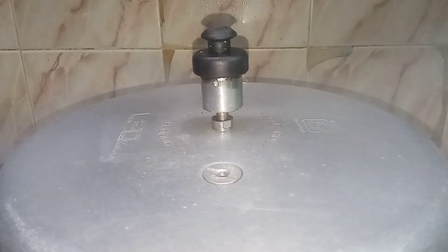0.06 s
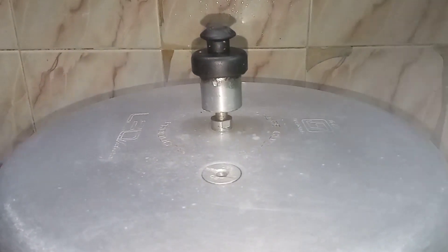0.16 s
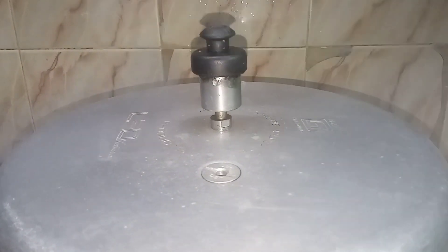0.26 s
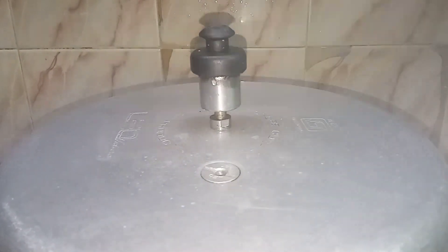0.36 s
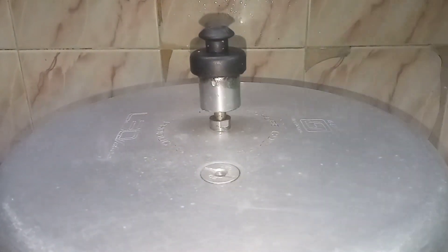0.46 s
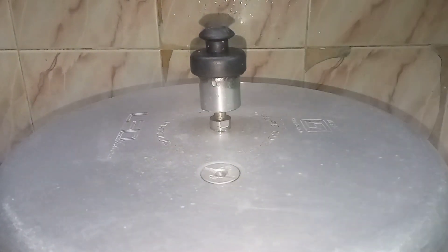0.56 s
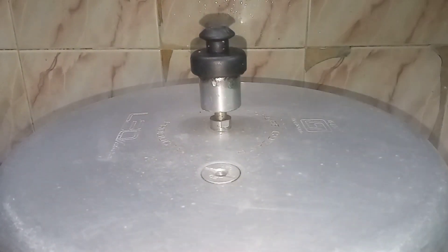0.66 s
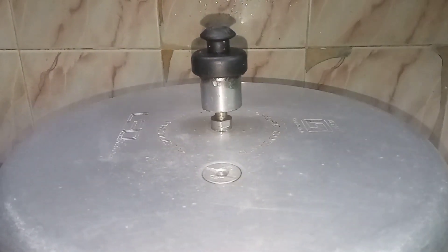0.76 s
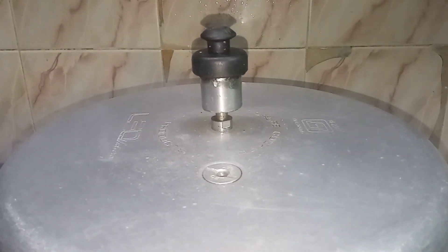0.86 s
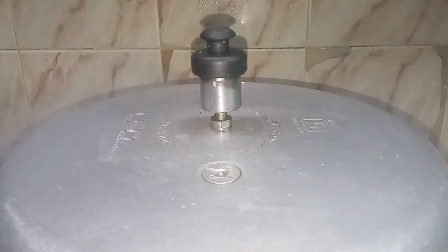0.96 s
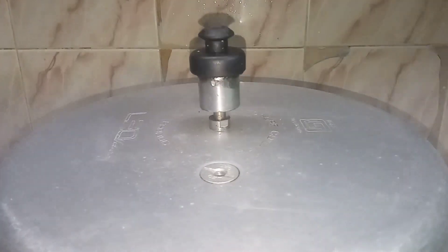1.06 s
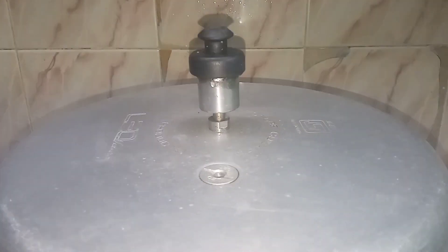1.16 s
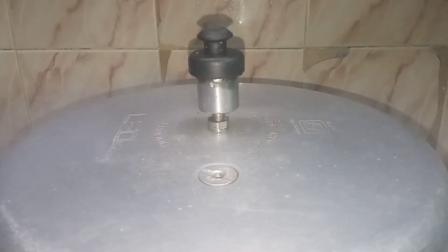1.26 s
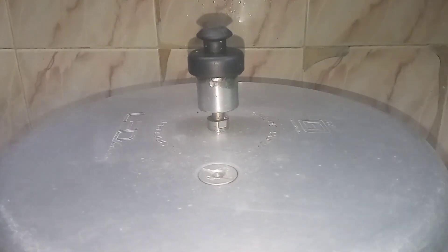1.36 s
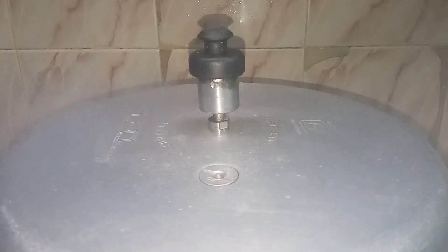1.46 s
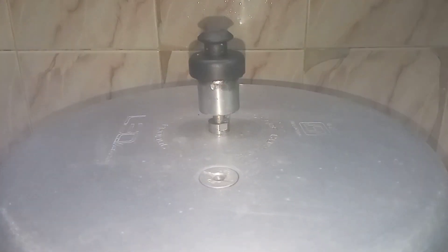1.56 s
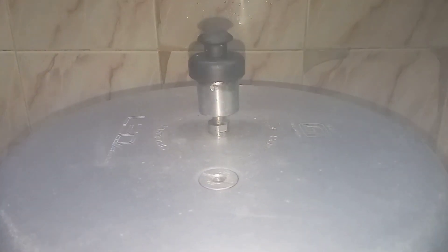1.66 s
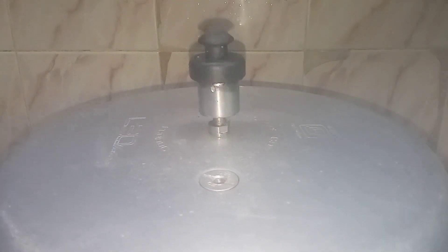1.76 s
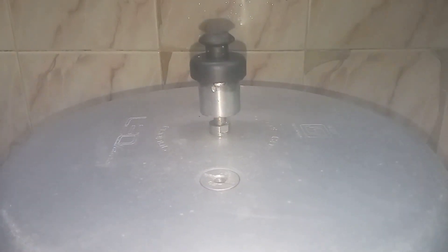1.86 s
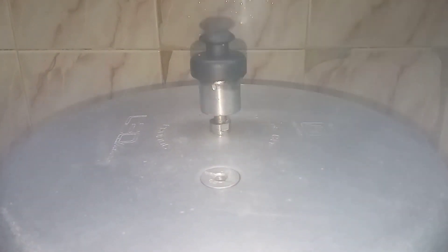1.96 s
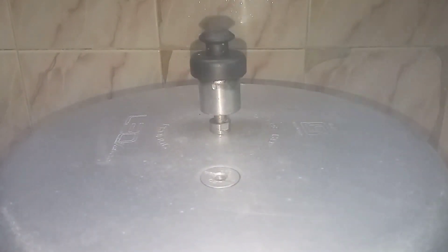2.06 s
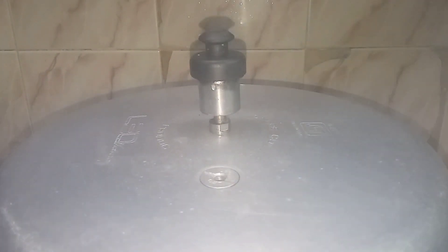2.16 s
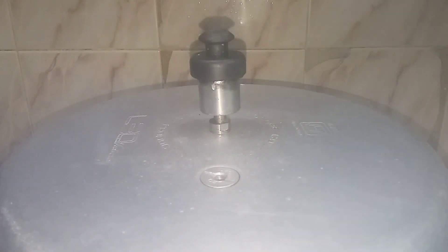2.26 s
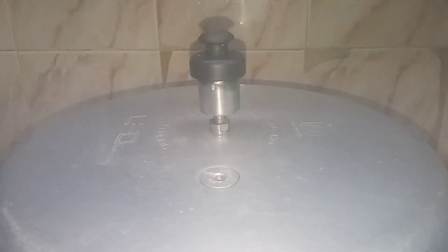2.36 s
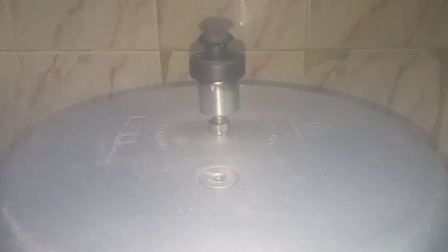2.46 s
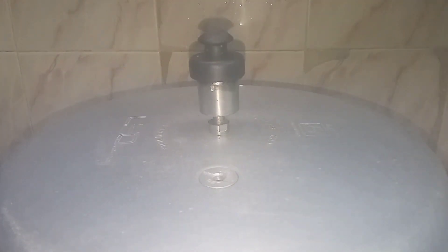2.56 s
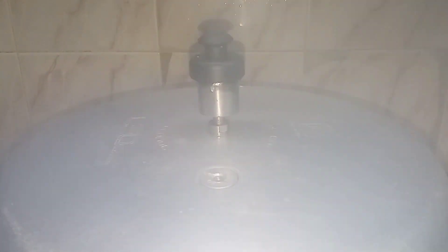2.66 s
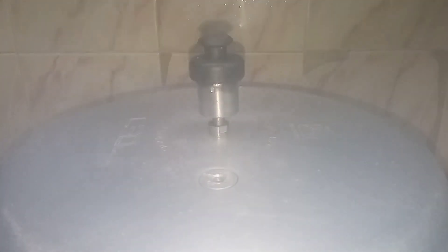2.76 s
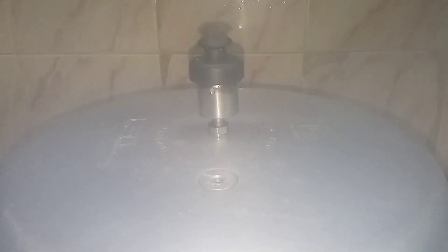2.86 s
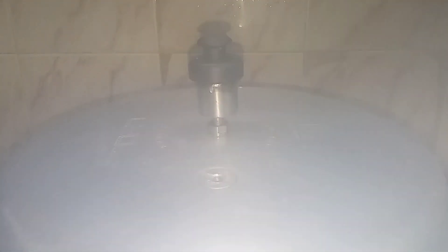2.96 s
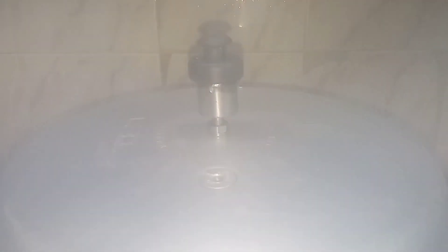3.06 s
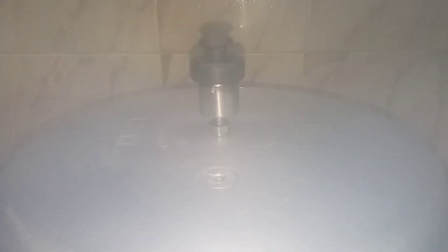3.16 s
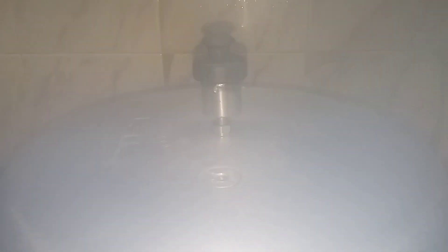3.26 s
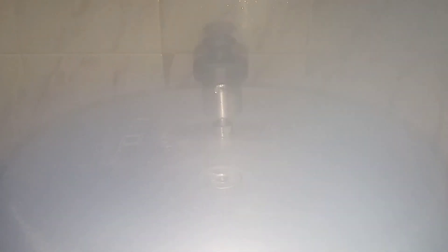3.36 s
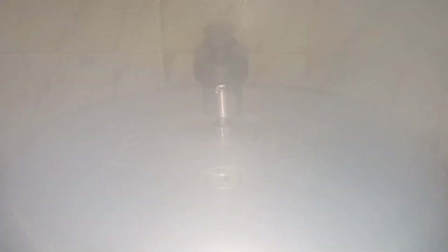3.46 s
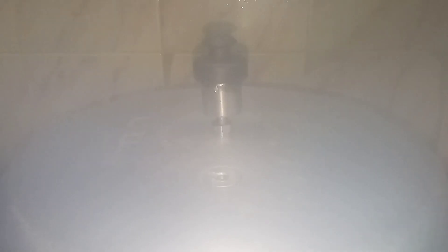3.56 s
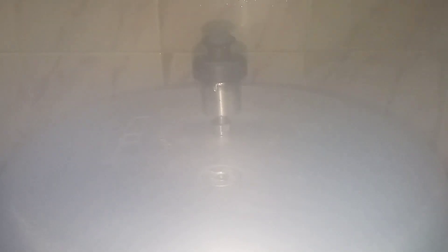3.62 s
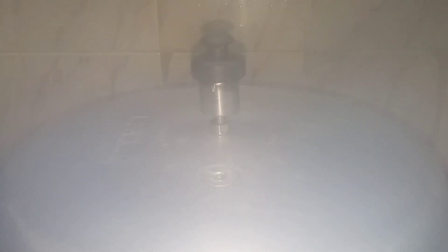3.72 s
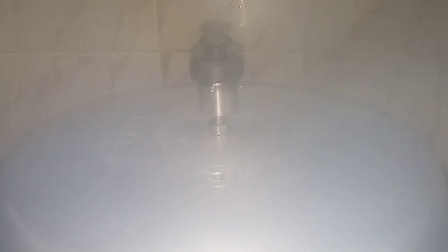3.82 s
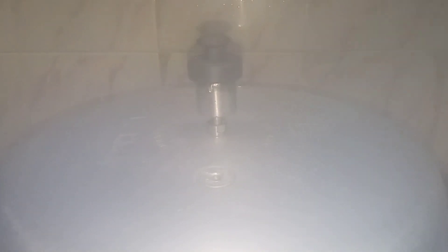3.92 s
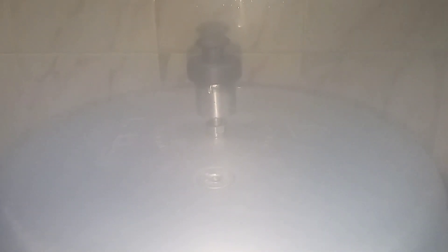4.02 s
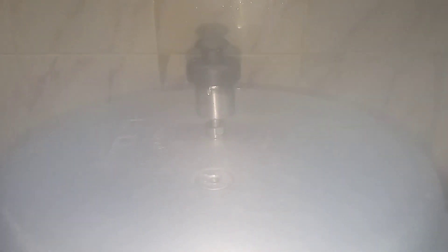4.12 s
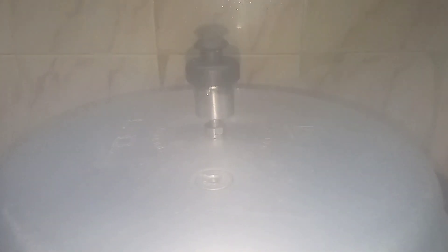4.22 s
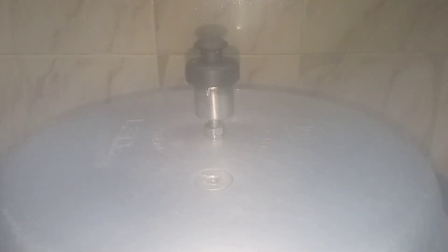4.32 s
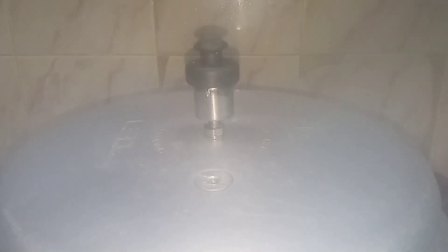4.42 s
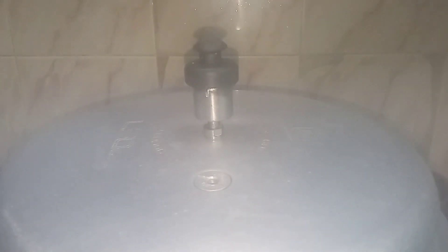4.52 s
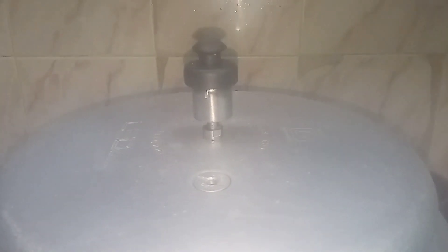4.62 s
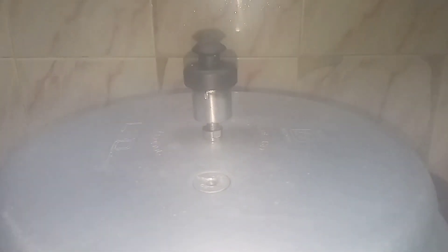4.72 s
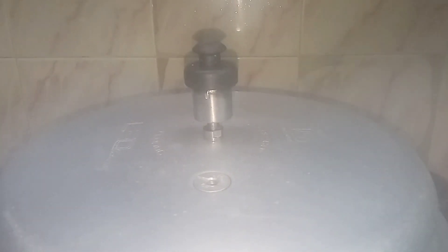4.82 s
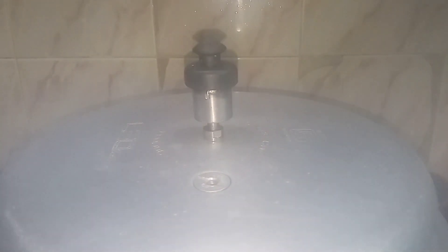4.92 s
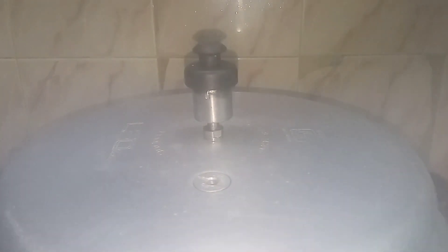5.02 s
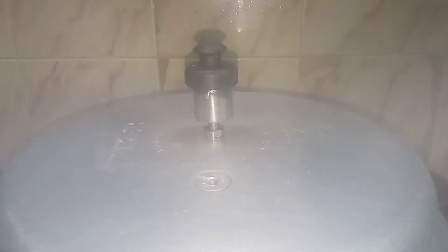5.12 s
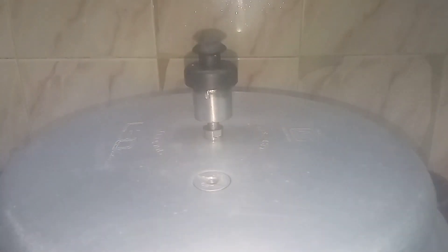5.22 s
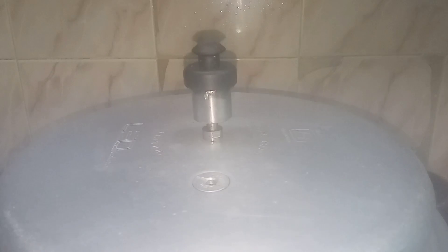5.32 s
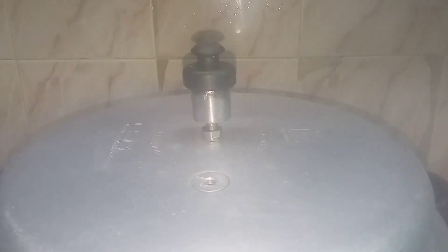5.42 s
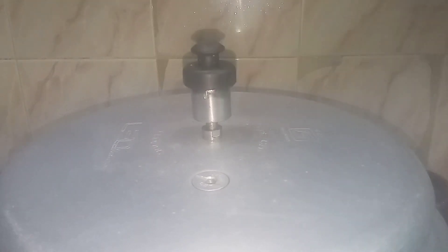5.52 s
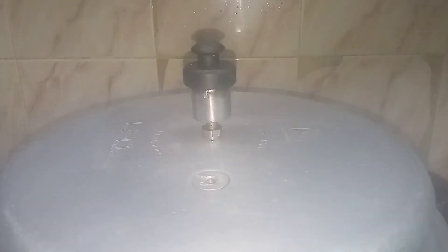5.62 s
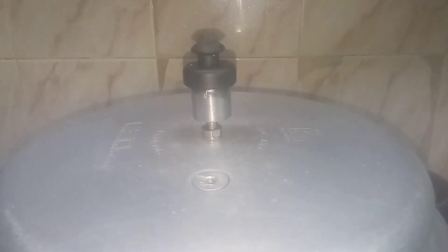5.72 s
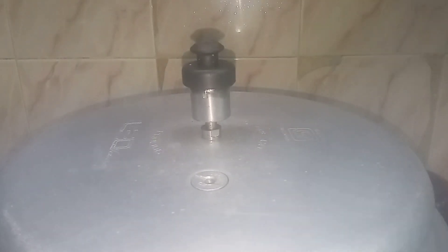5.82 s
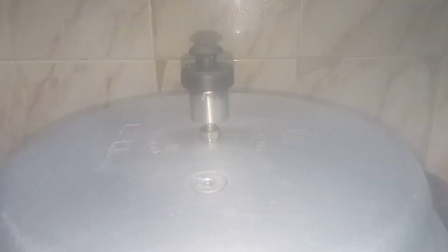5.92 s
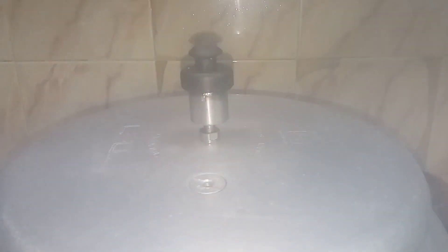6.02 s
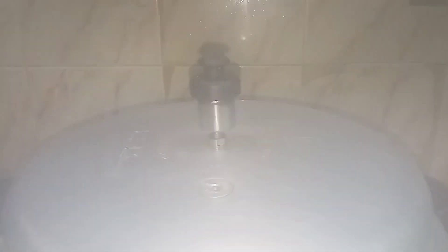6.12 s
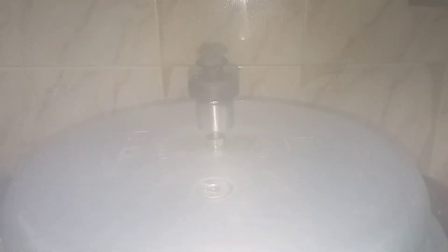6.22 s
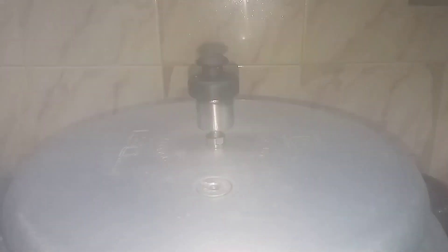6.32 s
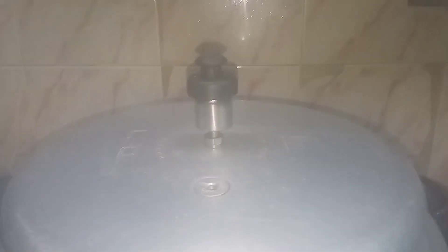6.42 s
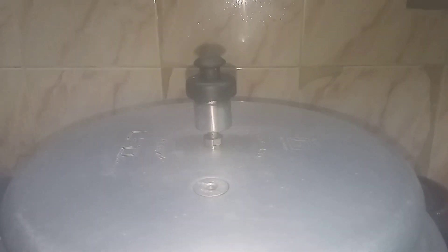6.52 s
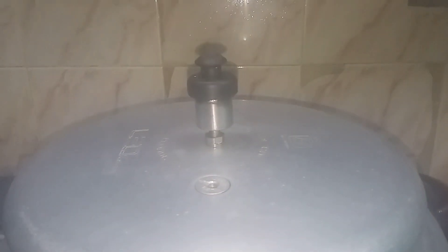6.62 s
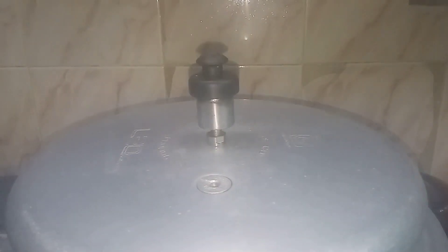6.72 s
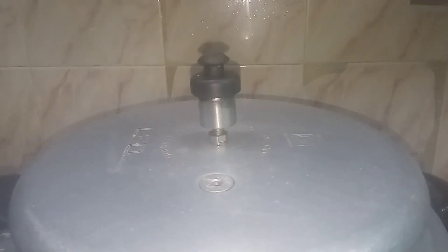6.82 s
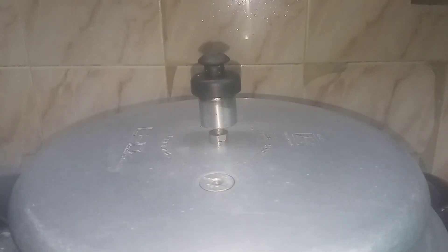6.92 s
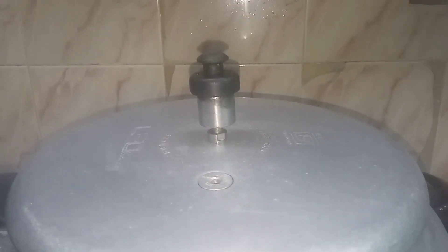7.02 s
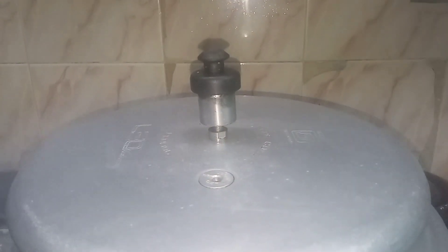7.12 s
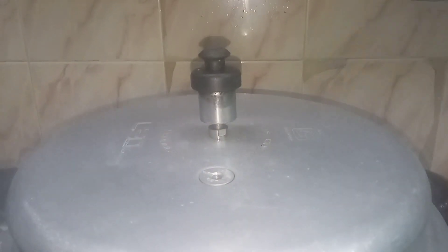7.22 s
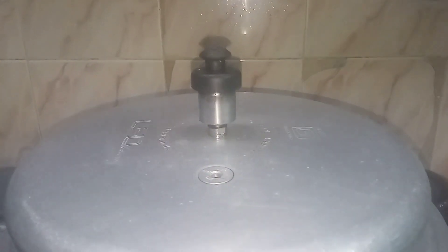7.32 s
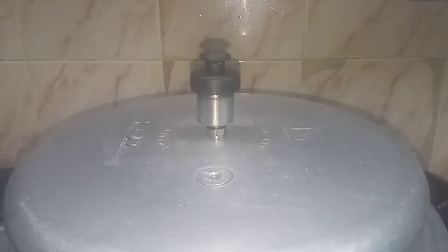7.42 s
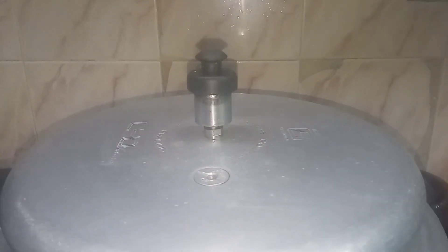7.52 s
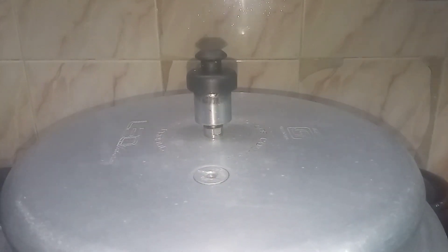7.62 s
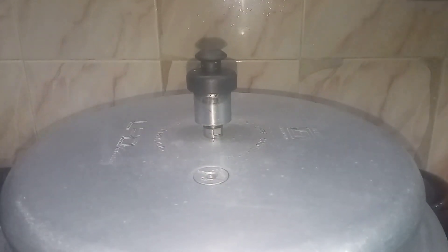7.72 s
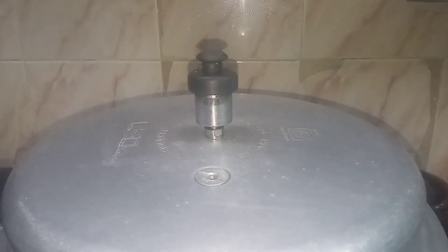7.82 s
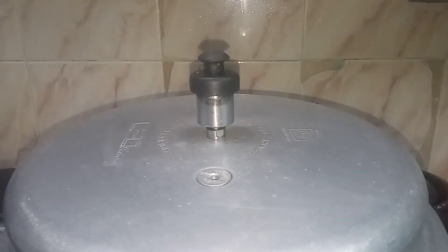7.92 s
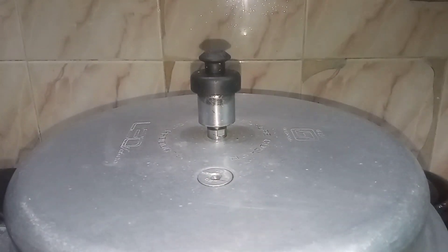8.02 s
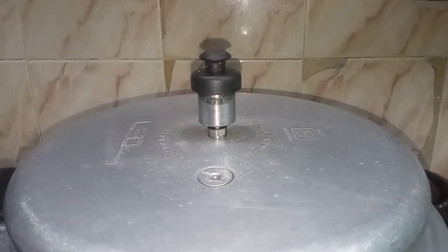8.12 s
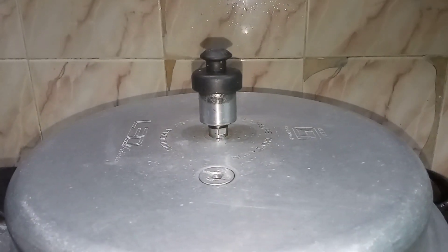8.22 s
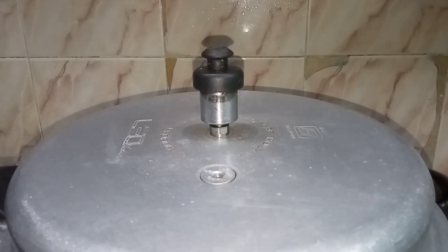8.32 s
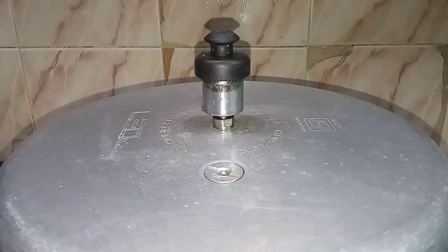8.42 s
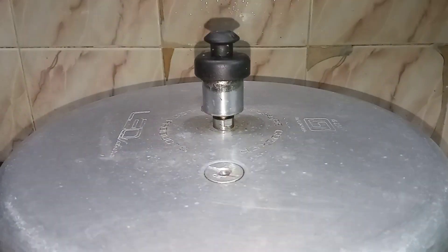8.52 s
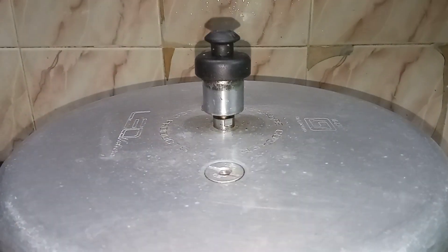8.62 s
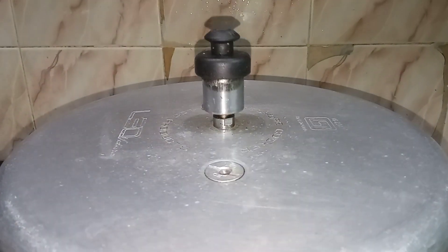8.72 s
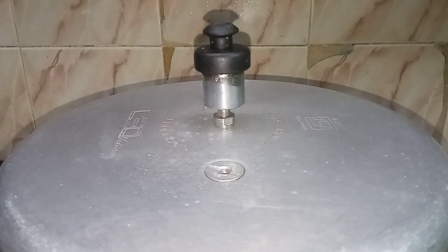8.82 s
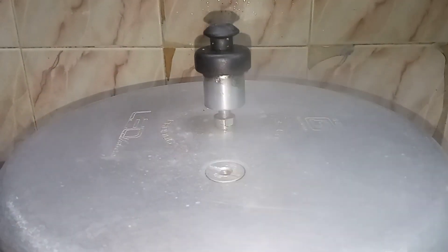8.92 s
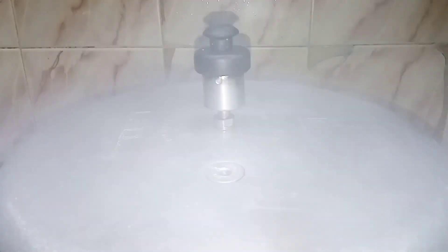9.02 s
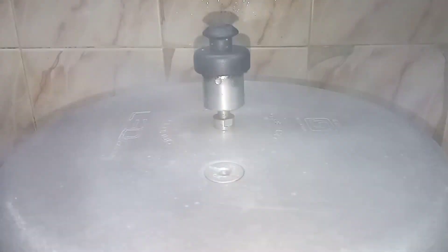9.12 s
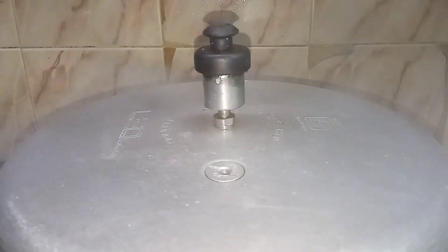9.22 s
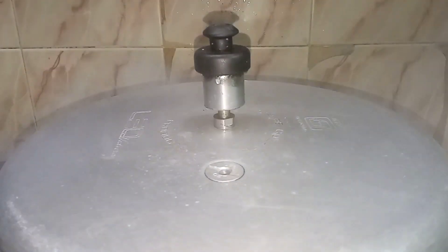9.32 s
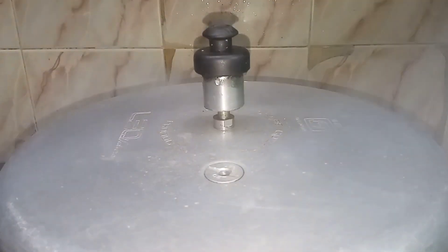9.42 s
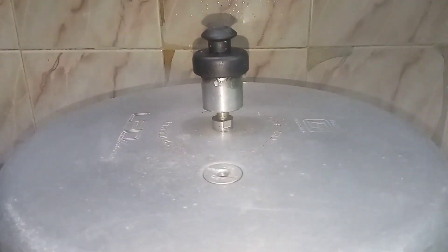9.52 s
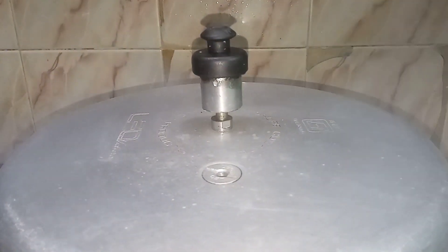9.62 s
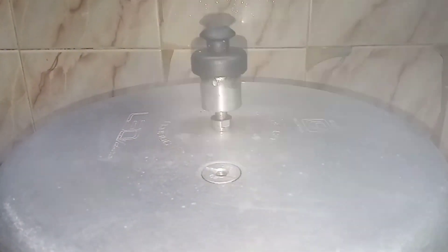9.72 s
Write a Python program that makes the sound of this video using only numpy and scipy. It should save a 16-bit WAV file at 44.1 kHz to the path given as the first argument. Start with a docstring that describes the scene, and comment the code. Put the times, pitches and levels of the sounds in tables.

```python
"""A loud hiss is heard first: a pressure cooker vents steam from under its weight valve in a tiled kitchen.
The steam is filtered noise, coloured by resonances and by diffuse tails off the tiles.
A draught buffets the close, hand-held microphone (low noise); the weight clatters down (short bursts that
ring the pot) and shuts the vent. The pot seethes and hums, a squeak swells and the level dips briefly.
Steam leaks out again, the weight lifts and the full hiss returns."""
import sys
import numpy as np
from scipy import signal
from scipy.fft import rfft, irfft
from scipy.io import wavfile

SR = 44100
rng = np.random.default_rng(int(sys.argv[2]) if len(sys.argv) > 2 else 0)


def transcribe(signal):
    """Save signal, clipped to [-1, 1], as a 16-bit WAV file at the path in sys.argv[1]."""
    frames = np.atleast_2d(signal).T
    limited = np.clip(frames, -1, 1)
    pcm = np.round(limited * 32767).astype(np.int16)
    wavfile.write(sys.argv[1], SR, pcm)


N = 430857
TIME = np.arange(N) / SR  # s
BINS = np.fft.rfftfreq(N, 1 / SR)  # Hz
EDGE_HZ = 15520  # upper limit of the band

# Diffuse decay of the tiled kitchen. Each row: frequency in Hz, time to decay by 60 dB in s.
KITCHEN_DECAY = [(200, .5), (1000, .45), (4000, .4), (7000, .33), (12000, .27), (16000, .18)]

# Spectrum of the burner and pot rumble. Each row: frequency in Hz, relative level in dB per Hz.
RUMBLE_SPECTRUM = [(25, -47), (60, -27.5), (110, -13.5), (165, -5.5), (215, -12), (270, 0), (325, 1.5),
                   (420, -4), (500, -5.5), (700, -15), (1500, -47), (4000, -76)]
# Spectrum of the seething pot. Each row: frequency in Hz, relative level in dB per Hz.
SEETHE_SPECTRUM = [(260, -26), (450, -23), (488, -11), (612, -25), (664, -19), (721, -16), (2410, -21),
                   (3900, -28), (5200, -48), (6760, -83), (11400, -120)]
STOVE_DB, STOVE_SHUT_DB = -63, -61  # rumble: throughout, and added while the vent is shut
BOIL_UP_S, BOIL_UP_DB = 2.2, 4.5  # from the start of a blast, the boil takes a while to build
SIMMER_FROM_S, SIMMER_TO_S, SIMMER_DB = 7.6, 8.92, -58  # the pot seethes while the vent is shut
SIMMER_RISE_DB_PER_S, SIMMER_FALL_DB_PER_S = 150, 50
FLARE_DB, FLARE_DB_PER_S = -51.5, 39  # it seethes harder just after the vent shuts and just before it opens

# Spectrum of moving air on the microphone. Each row: frequency in Hz, relative level in dB per Hz.
BUFFET_SPECTRUM = [(15, -51), (25, -34), (81, 1), (151, 0.5), (226, -2.5), (358, -10.5), (395, -12.5),
                   (600, -19), (700, -28), (910, -53), (1540, -120)]
# Gusts on the microphone. Each row: start in s, end in s, level in dB.
GUSTS_OF_AIR = [(6.6, 7.215, -42.2), (6.99, 7.03, -37.5), (7.3, 7.48, -53.5)]
GUST_RISE_DB_PER_S, GUST_FALL_DB_PER_S = 520, 85

# Faint hums while the vent is shut. Each row: start in s, end in s, frequency in Hz, level in dB.
FAINT_HUMS = [(7.8, 8.46, 163, -68), (7.85, 8.2, 320, -66), (8.17, 8.44, 489, -63), (8.57, 8.9, 323, -61.5)]

# Spectrum of the seep past the seated weight. Each row: frequency in Hz, relative level in dB per Hz.
SEEP_SPECTRUM = [(2940, -50), (5000, -21), (6010, -5.5), (8200, -30), (9710, -16), (13100, -17),
                 (13600, -14.5), (14400, 0), (15400, -1)]
SEEP_DB, SEEP_GROWS_S, SEEP_GROWTH_DB = -68, 8.2, 2.5  # it grows from this time until the leak

# Resonances of the squeak. Each row: frequency in Hz, width in Hz, relative level in dB.
SQUEAK_RESONANCES = [(6980, 130, -2), (7750, 110, -15)]
SQUEAK_S, SQUEAK_DB, SQUEAK_FADE_DB_PER_S = 8.41, -71, 230

# Knocks and sputters of the weight. Each row: start in s, rms level at the top in dB, centre in Hz,
# spread in octaves, swell time in s, ring of the pot relative to the burst in dB.
WEIGHT_KNOCKS = [(7.527, -39, 480, .8, 0.0021, -9), (7.543, -24, 1186, 0.42, 0.0015, -12),
                 (7.572, -26.5, 1050, 0.65, 0.0036, -3), (7.589, -32.5, 520, 1.1, 0.0075, -7),
                 (7.615, -40, 520, .9, 0.015, 2), (8.943, -38.5, 620, 0.32, 0.0034, -25),
                 (8.949, -33, 1100, 0.08, 0.004, -28)]
# Soft bumps and puffs of the boil. Each row: start in s, rms level at the top in dB, centre in Hz,
# spread in octaves, swell time in s, ring of the pot relative to the burst in dB.
BOIL_BUMPS = [(1.2, -53, 520, 0.92, 0.019, -22), (1.6, -61, 260, .15, 0.08, -45),
              (3.059, -63, 150, .6, 0.0084, -42), (4.33, -64, 165, .3, 0.05, -45),
              (6.1, -66, 170, .4, 0.06, -45), (8.44, -44, 200, 1.0, 0.0023, -37),
              (9.13, -43, 930, 1.5, 0.021, -26), (9.135, -57, 165, 0.35, 0.015, -40)]
# Modes of the pot. Each row: frequency in Hz, relative level in dB, time to decay by 60 dB in s.
POT_MODES = [(428, -12, 0.32), (556, 1, 0.14), (910, -24, .2), (1076, -2, .2), (1660, -10, .13),
             (1880, -12, 0.147), (3080, -8, .06), (3430, -4, .06)]

# Colour of the steam jet. Each row: frequency in Hz, relative level in dB per Hz.
JET_SPECTRUM = [(100, -45), (650, -28.1), (950, -16.5), (1800, -20.1), (2150, -10.8), (2900, -8.8),
                (3800, -5.9), (4600, -10.2), (6400, -3.0), (8000, -18.9), (10500, -20.3), (12500, -24.6),
                (13900, -14.0), (14800, 0.0)]
# Resonances of valve, lid and tiled corner. Each row: frequency in Hz, width in Hz, lift in dB.
JET_RESONANCES = [(521, 41, 4.2), (1429, 54, 2.3), (1599, 25, 3.4), (1755, 492, 5.6), (2079, 29, 3.5),
                  (2230, 30, 3.1), (2453, 21, 3.6), (2707, 51, 4.6), (2824, 88, 6.8), (2947, 46, 5.7),
                  (3076, 33, 3.2), (3240, 66, 4.4), (3358, 39, 3.6), (3806, 70, 2.5), (4577, 27, 3.1),
                  (5744, 83, 4.1), (6429, 76, 4.7), (6636, 60, 6.1), (6883, 46, 3.6), (7118, 115, 3.4),
                  (7615, 164, 3.4), (8291, 145, 5.8), (8497, 50, 4.7), (8940, 218, 4.0), (9687, 671, 8.1),
                  (10162, 317, 5.7), (10813, 589, 9.0), (11712, 1142, 9.0), (12693, 737, 7.6),
                  (14587, 185, 2.9)]
# Blasts while the weight is lifted. Each row: fully open in s, weight drops in s, level in dB,
# lift of the top sizzle in dB.
STEAM_BLASTS = [(0, 7.512, -25.65, 0.45), (8.935, 9.8, -25.55, 0.8)]
# The hiss swells, then sags, before the weight drops. Each row: middle in s, half length in s, change in dB.
STEAM_SURGES = [(6.55, 0.32, 0.5), (7.23, 0.23, -3.7)]
OPEN_DB_PER_S, SHUT_DB_PER_S = 195, 149  # how fast a blast builds and dies
# the sizzle needs pressure: it droops through a blast and dies first
SIZZLE_SHUT_DB_PER_S, SIZZLE_DROOP_DB_PER_S = 370, .16
LEAK_S, LEAK_DB = 8.48, -50  # the leak that comes before the weight lifts again

DIP_S, DIP_LENGTH_S, DIP_DB = 8.477, .135, -29  # the level dips briefly


def gain_of(db):
    """Decibels are logarithmic: 20 dB is a factor of ten in amplitude."""
    return 10 ** (np.asarray(db) / 20)


def evened(x):
    """Normalisation: equal mean power, so that the rms is 1."""
    return x / np.sqrt(np.mean(x ** 2) + 1e-20)


def read(points, hz):
    """Interpolation of a spectrum table along a logarithmic frequency axis."""
    f, value = np.transpose(points)
    return np.interp(np.log(hz + 1), np.log(f + 1), value)


def add(mix, s, sound):
    """Superposition: a sound is summed into the mix from s seconds on."""
    part = mix[round(s * SR):][:len(sound)]
    part += sound[:len(part)]


def shaped(x, gain):
    """Linear filtering: each frequency is multiplied by its own gain."""
    return irfft(rfft(x) * gain, N)


def resonances(rows):
    """Pairs each row's level in dB with a resonance curve over BINS that peaks at 1."""
    return [(db, 1 / (1 + (2 * (BINS - hz) / width) ** 2)) for hz, width, db in rows]


def noise(spectrum):
    """Coloured noise: white noise filtered to a given spectrum below the band edge, with rms 1."""
    gain = gain_of(read(spectrum, BINS)) * (BINS < EDGE_HZ)
    return evened(shaped(rng.standard_normal(N), gain))


def flutter(rate_hz, depth_db):
    """Random modulation: low-passed noise, with its rms depth in dB, becomes a wavering gain."""
    slow = evened(shaped(rng.standard_normal(N), 1 / (1 + (BINS / rate_hz) ** 2)))
    return gain_of(depth_db * slow)


def held(start, end, rise_db_per_s, fall_db_per_s):
    """Exponential growth and decay: a gain rises to 1 at start, holds until end and dies away."""
    before_s = np.maximum(start - TIME, 0)
    after_s = np.maximum(TIME - end, 0)
    return gain_of(-rise_db_per_s * before_s - fall_db_per_s * after_s)


def kitchen(x, count=3, stir_hz=1.2965):
    """Diffuse reverberation: each band decays at its own speed; swirling steam keeps changing the paths."""
    out = np.zeros(N)
    for k in range(count):
        hz, t, bands = signal.stft(rng.standard_normal(SR), SR, nperseg=256)
        decay = gain_of(-60 * t / read(KITCHEN_DECAY, hz)[:, None])
        tail = signal.istft(bands * decay, SR, nperseg=256)[1]
        # the squares of the shares sum to 1
        share = np.sqrt(2 / count) * np.cos(np.pi * (stir_hz * TIME + k / count))
        out += signal.fftconvolve(x * share, tail / np.linalg.norm(tail))[:N]
    return out


def stove():
    """Broadband boiling noise: a low rumble of flame and pot, and the seething that shows when the jet stops."""
    shut = held(SIMMER_FROM_S, SIMMER_TO_S, SIMMER_RISE_DB_PER_S, SIMMER_FALL_DB_PER_S)
    calm = np.zeros(N)
    for start, *_ in STEAM_BLASTS:
        calm += (TIME >= start) * np.clip(1 - (TIME - start) / BOIL_UP_S, 0, 1)
    boil = np.hypot(gain_of(STOVE_DB - BOIL_UP_DB * calm), gain_of(STOVE_SHUT_DB) * shut)
    rumble = noise(RUMBLE_SPECTRUM) * boil * flutter(rate_hz=11, depth_db=2.0)

    from_edge_s = np.minimum(abs(TIME - SIMMER_FROM_S), abs(TIME - SIMMER_TO_S))
    flare = gain_of(FLARE_DB - FLARE_DB_PER_S * from_edge_s)
    simmer = shut * np.hypot(gain_of(SIMMER_DB), flare)
    bubbling = flutter(rate_hz=60, depth_db=.8)
    return rumble + noise(SEETHE_SPECTRUM) * simmer * bubbling


def draught():
    """Flow noise: moving air buffets the microphone with lumpy low-frequency pressure."""
    gusts = [gain_of(db) * held(start, end, GUST_RISE_DB_PER_S, GUST_FALL_DB_PER_S)
             for start, end, db in GUSTS_OF_AIR]
    blowing = np.max(gusts, axis=0)
    return noise(BUFFET_SPECTRUM) * blowing * flutter(rate_hz=43, depth_db=3.0)


def hums():
    """Frequency modulation: faint sine tones of wavering pitch swell and fade."""
    out = np.zeros(N)
    for start, end, hz, db in FAINT_HUMS:
        size = round((end - start) * SR)
        turns = np.cumsum(hz * flutter(rate_hz=16.3, depth_db=0.8)[:size]) / SR
        tone = np.sin(2 * np.pi * turns) * signal.windows.tukey(size, .6)
        add(out, start, gain_of(db) * evened(tone))
    return out


def seep():
    """Leakage noise: a thin, high hiss escapes past the seated weight and grows as pressure builds again."""
    growth = np.clip((TIME - SEEP_GROWS_S) / (LEAK_S - SEEP_GROWS_S), 0, 1)
    return noise(SEEP_SPECTRUM) * gain_of(SEEP_DB + SEEP_GROWTH_DB * growth)


def squeak():
    """Resonant flow noise: a thread of steam forces its way past the seated weight with a breathy squeak."""
    colour = sum(gain_of(db) * curve for db, curve in resonances(SQUEAK_RESONANCES))
    swell = held(SQUEAK_S, SQUEAK_S, SQUEAK_FADE_DB_PER_S, SQUEAK_FADE_DB_PER_S)
    return evened(shaped(rng.standard_normal(N), colour)) * gain_of(SQUEAK_DB) * swell


def blows(rows):
    """Impact excitation: each blow is a short hollow burst that sets the decaying modes of the pot ringing."""
    out, t = np.zeros(N), np.arange(SR // 2) / SR
    hz = np.fft.rfftfreq(len(t), 1 / SR) + 1
    ring = sum(gain_of(db - 60 * t / t60) * np.sin(2 * np.pi * f * t) for f, db, t60 in POT_MODES)
    for s, db, centre_hz, spread, swell, ring_db in rows:
        colour = np.exp(-np.hypot(1, np.log2(hz / centre_hz) / spread) * 1.6)
        # blows that ring the pot hard also rasp, metal on metal
        colour += gain_of(ring_db - 12) * np.exp(-((hz - 3500) / 550) ** 2)
        envelope = t / swell * np.exp(1 - t / swell)  # peaks at 1 after the swell time
        burst = irfft(rfft(rng.standard_normal(len(t))) * colour) * envelope
        burst *= np.linalg.norm(envelope) / np.linalg.norm(burst)
        ringing = gain_of(ring_db) * ring * (1 - np.exp(-t / swell))
        add(out, s, gain_of(db) * (burst + ringing))
    return out


def jet():
    """Turbulent jet noise: steam rings the resonances round the valve and fills the room; a sizzle rides on top."""
    lift_db = sum(db * curve for db, curve in resonances(JET_RESONANCES))
    # so small a nozzle radiates little bass
    passband = BINS ** 2 / (BINS ** 2 + 90 ** 2) * (BINS < EDGE_HZ)
    colour = passband * gain_of(read(JET_SPECTRUM, BINS) + lift_db)
    hiss = evened(shaped(rng.standard_normal(N), colour))
    # the band above about 12600 Hz sizzles and swells apart from the rest
    top = shaped(hiss, 1 / (1 + (12600 / (BINS + 1)) ** 36))
    crackle = evened(flutter(rate_hz=200, depth_db=1.5))

    # the flow is that of the leak, or of a blast when the weight lifts
    flow = sizzle = gain_of(LEAK_DB) * (TIME > LEAK_S)
    for start, end, db, sizzle_db in STEAM_BLASTS:
        blast = gain_of(db) * held(start, end, OPEN_DB_PER_S, SHUT_DB_PER_S)
        flow = np.maximum(flow, blast)
        droop_db = SIZZLE_DROOP_DB_PER_S * np.maximum(TIME - start, 0)
        sizzle_open = held(start, end, OPEN_DB_PER_S, SIZZLE_SHUT_DB_PER_S)
        sizzle = np.maximum(sizzle, gain_of(db + sizzle_db - droop_db) * sizzle_open)

    surge_db = sum(db * np.exp(-((TIME - s) / half) ** 2) for s, half, db in STEAM_SURGES)
    steam = (hiss - top) * flow * gain_of(surge_db) + top * crackle * sizzle
    # the floating weight wobbles and throttles the whole jet
    steam *= flutter(rate_hz=17, depth_db=0.66)
    room_share = .12  # of the power: so near the valve, most of the sound arrives direct
    return np.sqrt(1 - room_share) * steam + np.sqrt(room_share) * kitchen(steam)


def scene():
    """Superposition of all sources, the same in both channels."""
    knocks = blows(WEIGHT_KNOCKS + BOIL_BUMPS)
    knocks_in_room = knocks + gain_of(-5.5) * kitchen(knocks)
    mono = stove() + draught() + hums() + seep() + squeak() + knocks_in_room + jet()
    return np.array([mono, mono])


def record(dry):
    """Gain and band limiting: the level drops abruptly and creeps back, then a low-pass filter follows."""
    recovered = np.clip((TIME - DIP_S) / DIP_LENGTH_S, 0, 1)
    dip_db = DIP_DB * (TIME > DIP_S) * (1 - recovered ** 2)
    low_pass = signal.firwin(1023, EDGE_HZ, window=("kaiser", 9), fs=SR)
    return signal.oaconvolve(dry * gain_of(dip_db), low_pass[None], "same")


dry = scene()
out = record(dry)
transcribe(out)
```